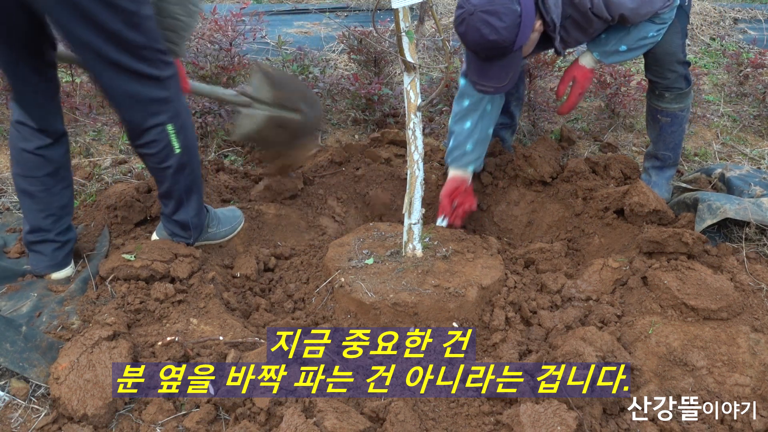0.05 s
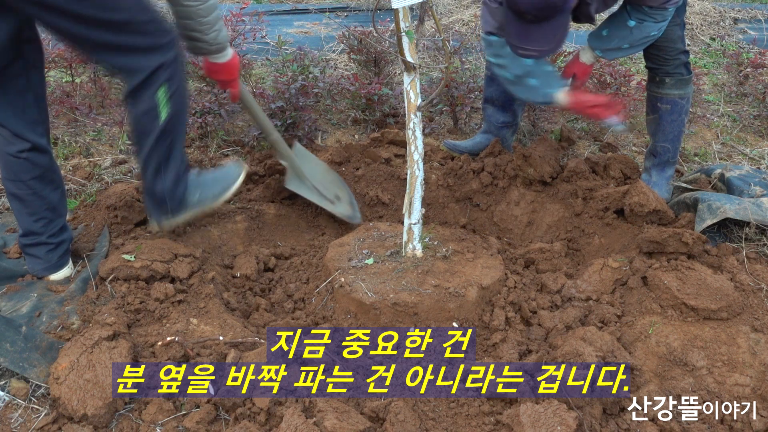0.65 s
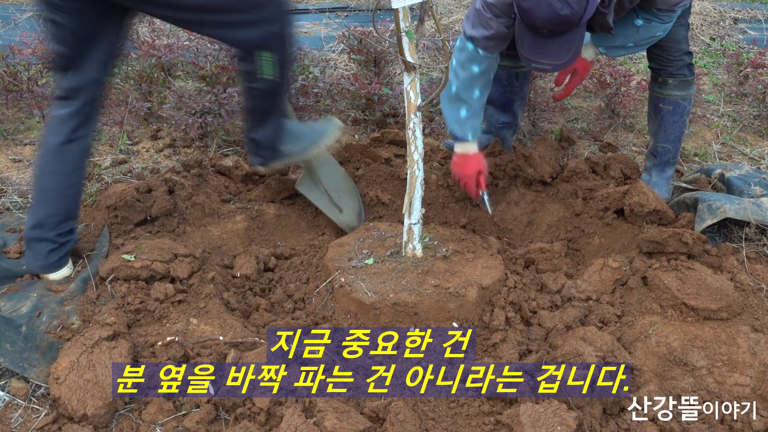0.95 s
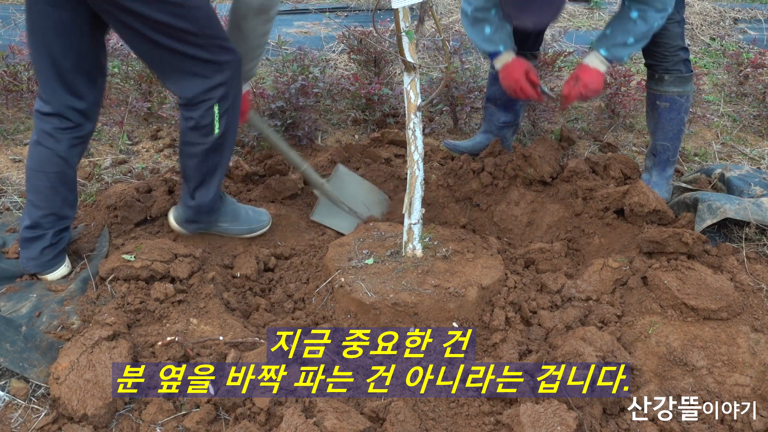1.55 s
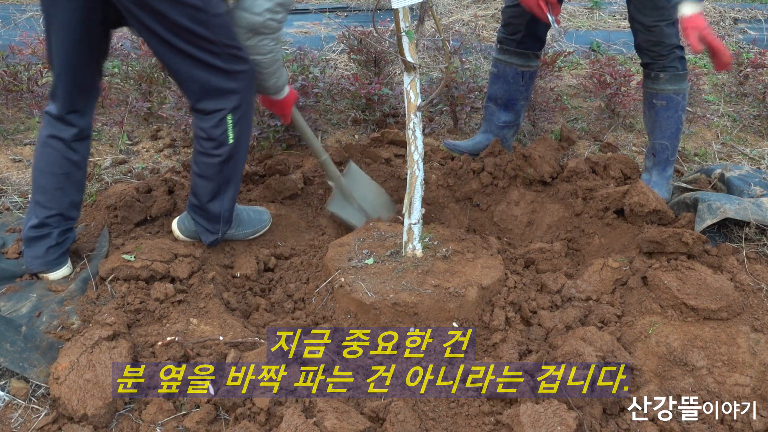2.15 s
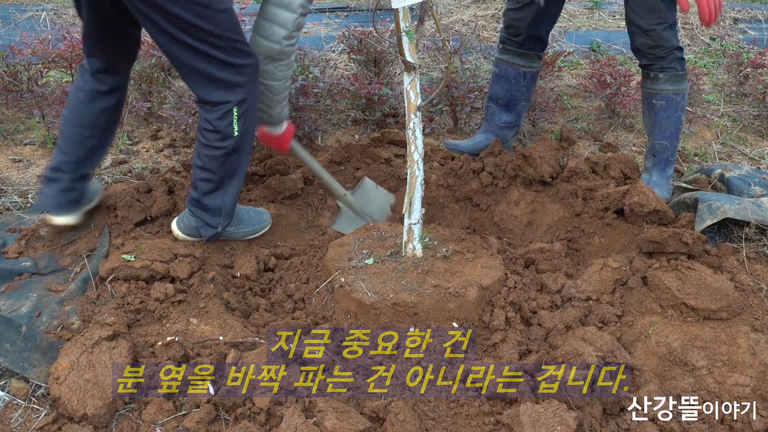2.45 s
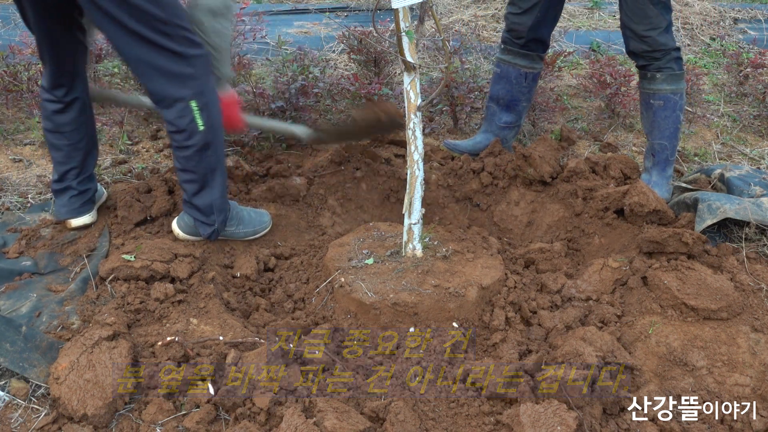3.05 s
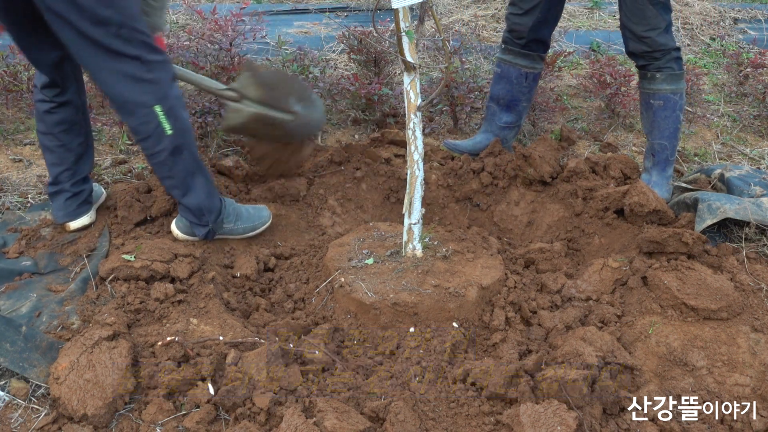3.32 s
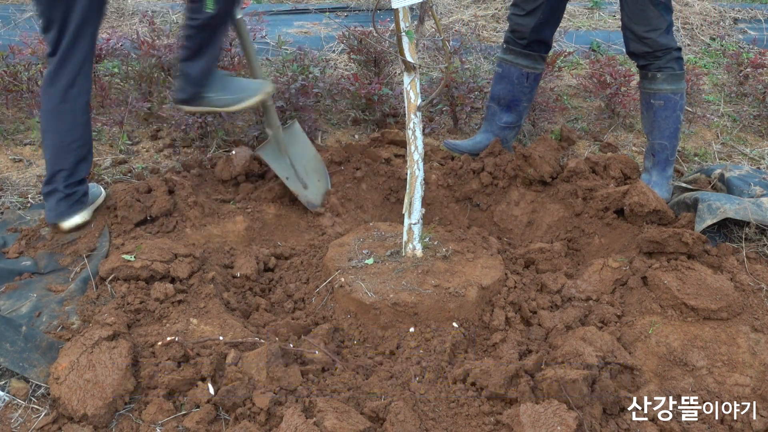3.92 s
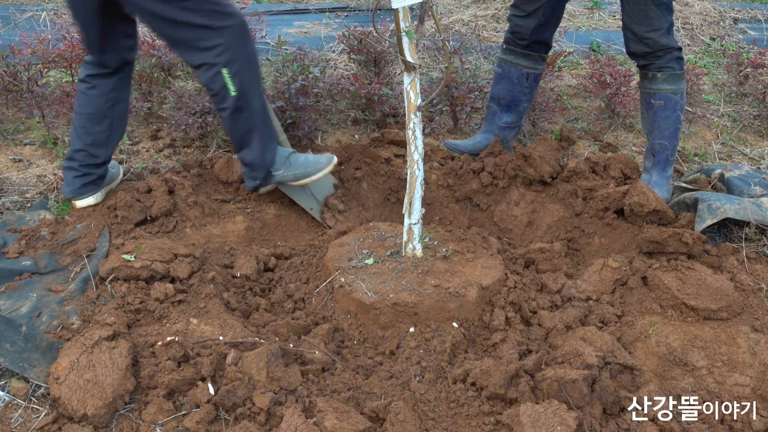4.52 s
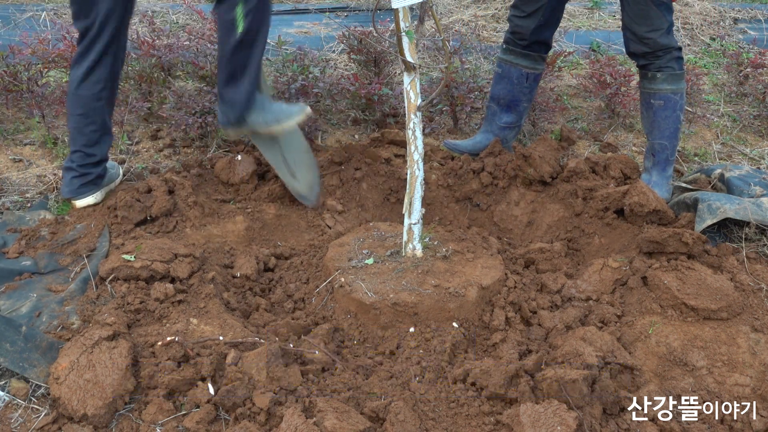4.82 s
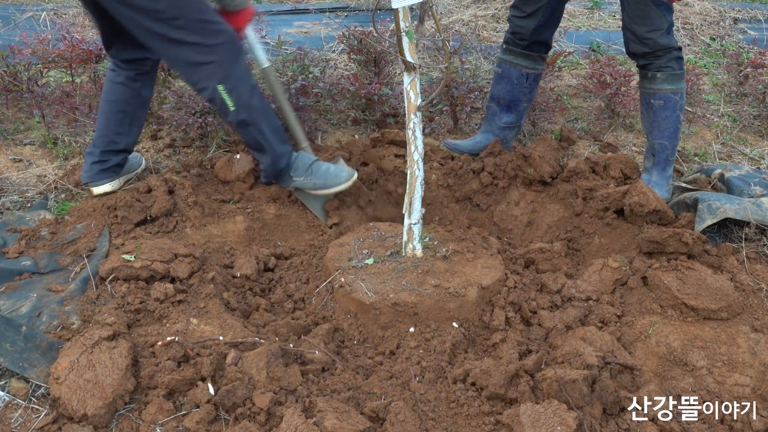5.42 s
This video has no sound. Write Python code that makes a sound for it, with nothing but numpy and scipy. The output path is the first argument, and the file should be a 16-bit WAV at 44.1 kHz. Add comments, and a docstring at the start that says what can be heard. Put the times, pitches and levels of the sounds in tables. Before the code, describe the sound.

A steel shovel blade crunches into hard soil several times, with loose dirt spilling and faint ringing scrapes in between.

```python
"""A steel shovel is stamped into firm clay around a young tree, outdoors, a couple of metres away.
First, over a distant rush like road traffic, pebbles drop and a light scrape makes the free blade ring.
After a second a shoe thuds and the edge bites, grinds through grit and stalls; clods break, fine earth
spills. A softer thrust follows, the rush fades, and loose earth slides between more scrapes.
Two hard thrusts come near 4 and 5 seconds, and a few last pebbles land."""
import sys
import numpy as np
from scipy import signal
from scipy.fft import rfft, irfft
from scipy.io import wavfile

SR = 44100
rng = np.random.default_rng(int(sys.argv[2]) if len(sys.argv) > 2 else 0)


def wrap_up_sound(samples):
    """Save the sound to the file named by the first command line argument, as 16-bit audio."""
    columns = np.atleast_2d(samples).T
    # keep every value between -1 and 1, then stretch to whole-number steps
    tamed = np.clip(columns, -1, 1)
    steps = np.round(tamed * 32767).astype(np.int16)
    wavfile.write(sys.argv[1], SR, steps)


N = 241636
T = np.arange(N) / SR

# each jerk of the blade into the clay:
# (time [s], push length [s], final level [dB], build-up [dB], time to fall 20 dB [s])
BLADE_JERKS = [(1.0676, 0.0142, -9, 1, 0.0465), (1.108, 0.0132, -14, 0, 0.0741),
               (2.248, 0.018, -33, -1, 0.0385), (2.271, 0.04285, -22.5, 0, .026),
               (4.188, .032, -8.7, 19, .032), (5.062, 0.0327, -7.5, 7, .044)]


def undb(db):
    """Turn decibels into a gain, the number a sound is multiplied by."""
    return 10 ** (np.asarray(db) / 20)


def unit(x):
    """Scale to an average power of 1."""
    return x / np.sqrt(np.mean(x ** 2))


def together(gains):
    """Combine gains: unrelated sounds add in power."""
    return np.sqrt(sum(gain ** 2 for gain in gains))


def curve(rows):
    """A gain that follows (time [s], level [dB]) rows."""
    return undb(np.interp(T, *np.transpose(rows)))


def wander(rate):
    """A random drift, roughly 1 in size, that takes a new course rate times a second."""
    knots = rng.standard_normal(8192)
    return np.interp(T * rate, np.arange(len(knots)), knots)


def swell(time, rise, fall):
    """A gain that peaks at the given time; rise and fall are the seconds a 20 dB change takes."""
    return 10 ** -np.minimum(np.where(T < time, ((time - T) / rise) ** 2, (T - time) / fall), 10)


def grains(rate, spread_db):
    """Tiny cracks of uneven size at random moments, about rate of them a second."""
    breaks = rng.random(N) < rate / SR
    return unit(breaks * rng.choice([-1, 1], N) * undb(spread_db * rng.standard_normal(N)))


def colour(x, tone):
    """Shape bass and treble by (pitch [Hz], level [dB]) rows; white noise keeps its power."""
    hz, db = np.transpose(tone)
    freqs = np.maximum(np.arange(N // 2 + 1) * SR / N, 1)
    gains = unit(undb(np.interp(np.log(freqs), np.log(hz), db)))
    return irfft(rfft(x) * gains, N)


def resonate(x, hz, width):
    """Let through a band of pitches around hz; a narrower band rings longer."""
    return signal.lfilter(*signal.iirpeak(min(hz, SR / 2 - 1), hz / min(width, SR / 4), fs=SR), x)


def ring(x, modes, roam_db):
    """Ring an object's natural tones (modes); each gets stronger or weaker as the contact point roams."""
    out = power = 0
    for k, (hz, width, db) in enumerate(modes):
        drive = (-1) ** k * undb(db + roam_db * wander(12))
        out = out + resonate(x * drive, hz, width)
        power += undb(db) ** 2 * np.pi * width / SR
    return out / np.sqrt(power)


def smear(x, fall, rate):
    """Add a short noisy tail, 20 dB down after fall seconds; two tails blend as the contact moves."""
    t = T[:SR // 8]
    turn = 1.66 * wander(rate)
    tails = rng.standard_normal((2, len(t))) * 10 ** (-t / fall)
    return sum(signal.fftconvolve(x * share, tail / np.linalg.norm(tail))[:N]
               for share, tail in zip((np.cos(turn), np.sin(turn)), tails))


def knocks(rows, rise, fall, cycles, breadth):
    """Dull hits, each a burst of noise in one broad band; low ones last longer."""
    out = 0
    for time, db, hz in rows:
        noise = rng.standard_normal(N)
        hit = noise * swell(time, rise, fall + cycles / hz)
        width = breadth * hz
        steady, burst = resonate(resonate([noise, hit], hz, width), hz, width)
        out = out + undb(db) * burst / np.std(steady)
    return out


def distant(tone, side_db, lean_db, waver_db):
    """A far, wide, gently wavering wash of noise, stronger on the left."""
    mid, side = colour(rng.standard_normal((2, N)), tone)
    lean = undb(lean_db / 2)
    stereo = np.array([mid * lean, mid / lean]) + undb(side_db) * np.array([side, -side])
    return stereo * undb(waver_db * wander(15))


def outdoors(x, scatter_db, scatter_s):
    """Place a sound to the left of centre; clods and shrubs scatter a faint echo, unlike on each side."""
    # the blade digs near the centre and throws to the left: (time [s], left minus right [dB])
    place = [(.1, 7.5), (.25, 3), (1.1, 0.15), (2.3, 0.35), (3.3, 2), (4.2, 0.74), (5.1, 0.5)]
    # the echo is stronger in the treble: (pitch [Hz], level [dB])
    echo_tone = [(100, -14), (600, -9.5), (2000, -4), (4500, -1), (8000, -0.5), (12000, 0.5)]
    echo = undb(scatter_db) * colour(smear(x, scatter_s, rate=8.8), echo_tone)
    lean = np.sqrt(curve(place))
    return np.array([x * lean + echo, x / lean - echo])


def open_air():
    """The faint hush of the outdoors."""
    # tone of the hush: (pitch [Hz], level [dB])
    air_tone = [(20, -35), (60, -16), (130, -19), (230, -15), (330, -13), (480, -4), (670, 2), (1000, -1.5),
                (1430, -3.5), (2000, -12), (4100, -14.5), (6000, -15.5), (12000, -17.5), (15500, -23)]
    return undb(-47.5) * distant(air_tone, side_db=-6.5, lean_db=3, waver_db=1.2)


def far_rush():
    """A rush like distant road traffic fades, then comes back a little."""
    # how the rush fades: (time [s], level [dB])
    loudness = [(0, -40.5), (.6, -44), (1.3, -42.5), (1.7, -45), (2.1, -49.5), (3, -54.5), (3.7, -53),
                (5.48, -50)]
    # tone of the rush: (pitch [Hz], level [dB])
    rush_tone = [(100, -41), (400, -26.5), (680, -4), (1450, 0.5), (2100, -4.5), (3000, -14.5),
                 (6000, -23.5), (16000, -24.5)]
    return undb(-1.08) * curve(loudness) * distant(rush_tone, side_db=-10, lean_db=8.5, waver_db=0.62)


def trickling_earth():
    """Fine dry earth spills after each thrust and slides as the blade moves, hissing in small surges."""
    # earth slides as the blade levers, lifts or is set down:
    # (time [s], level [dB], time to swell or fade 20 dB [s], whose sign is ignored)
    earth_slides = [(.38, -48, 0.27), (1.0, -35, 0.1277), (1.389, -40, 0.1738), (1.63, -41.5, 0.24),
                    (1.92, -44, 0.235), (2.22, -49.5, 0.04), (2.479, -41.5, 0.096), (2.601, -36.5, 0.1038),
                    (2.718, -39.5, 0.089), (2.82, -46, .1), (3.299, -41.5, -0.1), (3.6, -46, 0.2743),
                    (3.9, -38.5, 0.221), (4.18, -47, 0.11), (4.49, -43.5, 0.5368), (4.7, -43, 0.52),
                    (4.92, -38, 0.3558)]
    # tone of fine earth: (pitch [Hz], level [dB])
    earth_tone = [(100, -23.5), (300, -10.5), (600, 1), (1500, -0.5), (3000, -2), (5000, -1.5), (8000, -1),
                  (12000, 1.5), (14000, -4.5), (16000, -6.5)]
    spills = [undb(db - 21) * swell(time + length, rise=0.03, fall=0.2824)
              for time, length, db, _, _ in BLADE_JERKS]
    slides = [undb(db) * 10 ** -np.minimum(((T - time) / width) ** 2, 10)
              for time, db, width in earth_slides]
    creep = undb(-61)  # earth that never quite settles
    flow = together(spills + slides + [creep]) * undb(1.2 * wander(70))
    dust = grains(14000, spread_db=3.5)
    crumbs = undb(-8.5) * grains(200, spread_db=5)
    earth = flow * (dust + crumbs)
    return colour(undb(-0.0167) * earth + undb(-13.5) * smear(earth, fall=0.0048, rate=12), earth_tone)


def falling_pebbles():
    """Crumbs and pebbles land with short ticks."""
    # landings: (time [s], level [dB], pitch [Hz])
    landings = [(.0855, -19, 13100), (.318, -30.5, 7900), (.332, -37, 7440), (.352, -33, 8500),
                (.4275, -30, 7550), (1.1735, -21.5, 1013), (2.421, -34, 2000), (2.587, -34.5, 12000),
                (2.812, -38, 1600), (4.2742, -23, 12000), (4.3135, -28, 12500), (4.3272, -24.5, 2000),
                (4.346, -30, 1390), (4.497, -33.5, 3970), (4.758, -35, 1200), (5.302, -31.5, 1570),
                (5.353, -32, 1344), (5.411, -37, 1590)]
    return knocks(landings, rise=0.000395, fall=0.002, cycles=7, breadth=0.815)


def shoe_thuds():
    """Shoes thud on the soil and on the top of the blade."""
    # footfalls: (time [s], level [dB], pitch [Hz])
    steps = [(1.062, -30, 800), (1.513, -44, 429), (1.625, -51, 353), (2.440, -42, 720), (2.578, -46, 520),
             (4.1825, -32, 560), (4.232, -39, 221), (5.262, -45, 364)]
    return knocks(steps, rise=0.0046, fall=0.0298, cycles=2.07, breadth=1.0)


def blade_scrapes():
    """Grains rub along the free blade, whose steel rings on."""
    # the blade brushes the ground: (time [s], level [dB], time to rise 20 dB [s])
    # a minus sign on the rise only shortens the fall
    strokes = [(.800, -27.5, 0.015), (0.832, -29, .006), (.843, -26, 0.0348), (1.850, -38.5, 0.08),
               (1.897, -35.5, 0.053), (1.967, -34.5, 0.0122), (3.298, -36, -0.0413), (3.741, -26, 0.0085),
               (3.753, -22.5, 0.0029), (4.707, -26, 0.0058), (4.726, -25, -0.0044), (4.757, -26.5, -0.0045),
               (4.784, -28.5, 0.0069), (4.872, -28.5, -0.001)]
    # tone of the rubbing: (pitch [Hz], level [dB])
    rub_tone = [(200, -22), (600, -10), (1400, -6), (4500, 1.5), (7000, -1), (12500, -0.5), (14000, -4.5),
                (16000, -5.5)]
    # natural tones of the free blade: (pitch [Hz], width [Hz], level [dB])
    free_modes = [(1310.2, 19.5, 6.5), (1495.6, 20.4, 2), (2223.4, 46.5, 0.5), (2407, 29.6, 4.5),
                  (2891, 46, -7), (3660, 20.7, 1.5), (4441, 43, -4), (5503, 47, -3.5), (6030, 80, -6),
                  (7980, 49, -1), (9050, 82, 1), (11100, 77, 2), (11780, 58, 0), (12400, 97, 4.5),
                  (12670, 40, -8.5), (13100, 52, 3)]
    force = together(undb(db) * swell(time, rise, fall=0.027 + 0.6 * rise) for time, db, rise in strokes)
    rub = force * grains(7000, spread_db=3)
    sheet = undb(-4) * (rub + smear(rub, fall=0.0097, rate=6))
    return colour(sheet, rub_tone) + undb(-4.5) * ring(rub, free_modes, roam_db=3.5)


def push(start, length, build_db, fall):
    """The force of one jerk: a sharp bite, a change of build_db as the blade sinks, then a stall."""
    bite = swell(start, rise=0.0019, fall=np.inf)
    to_go = np.clip((start + length - T) / length, 0, 1)
    stall = 10 ** -np.clip((T - start - length) / fall, 0, 10)
    return bite * undb(-build_db * to_go) * stall


def shovel_thrusts():
    """The edge crushes grit in jerks; the buried blade rings briefly and breaking clods crunch low."""
    # clods breaking under the blade: (time [s], level [dB])
    clods = [(1.077, -14.5), (1.090, -14.5), (1.108, -11.5), (1.118, -15), (1.176, -25.5), (2.295, -24),
             (2.314, -27), (4.218, -21), (4.2365, -12.5), (5.0934, -5.5), (5.098, -6)]
    # tone of crushed grit: (pitch [Hz], level [dB])
    grit_tone = [(30, -32), (150, -24), (330, -20), (500, -14), (900, -7.5), (2000, -2), (3200, -1.5),
                 (5500, -0.5), (7000, -1), (9000, 1), (12000, -1), (14000, -4), (16000, -4.5)]
    # natural tones of the buried blade: (pitch [Hz], width [Hz], level [dB])
    buried_modes = [(2966, 130, -9), (3404, 70, -15.5), (3891, 61, -10.5), (5201, 136, -6.5),
                    (6189, 71, -7.5), (8080, 60, -10.5), (8910, 44, -0.5), (9820, 87, -8),
                    (11160, 98, -3.5), (11237, 39, 5), (12040, 112, -3), (14600, 45, -9)]
    # natural tones of shaft, blade and clod together: (pitch [Hz], width [Hz], level [dB])
    clod_modes = [(279.6, 40.4, -22.5), (468, 97.5, -5.5), (649.2, 116.8, 1.5), (1145.7, 118.6, 2),
                  (1300, 40, 0.5), (1485, 162, -2.5), (2147, 246, -6.5)]
    sink_s, edge_hz = 0.00145, 3980  # until it sinks in, the edge sounds mostly above this pitch
    clod_low_hz = 170  # the crunch carries nothing below this pitch

    jerks = [undb(db) * push(time, length, build, fall) for time, length, db, build, fall in BLADE_JERKS]
    force = together(jerks)
    # harder pushes sink in sooner
    sunk = together(jerk * (1 - np.exp(-np.cumsum(jerk) / SR / sink_s)) for jerk in jerks)
    breaks = together(undb(db) * swell(time, rise=0.00396, fall=0.0207) for time, db in clods)

    judder = undb(1.72 * wander(450))  # the blade sticks and slips
    crushing = judder * grains(16000, spread_db=4)
    coarse = signal.lfilter(*signal.butter(1, edge_hz, fs=SR), crushing)
    crumbling = undb(-3) * breaks  # a breaking clod also crushes grit
    grit = together([force, crumbling]) * (crushing - coarse) + together([sunk, crumbling]) * coarse
    crunch = together([breaks, undb(-12.5) * sunk]) * judder * grains(5000, spread_db=3)
    crunch = signal.sosfilt(signal.butter(2, clod_low_hz, "high", fs=SR, output="sos"), crunch)

    # the steel sheet's many crowded tones die quickly
    sheet = undb(0.11) * grit + undb(-3.5) * smear(grit, fall=0.00556, rate=9)
    blade_ring = undb(-8.5) * ring(grit, buried_modes, roam_db=-0.5)
    clod_ring = undb(-2.5) * ring(crunch, clod_modes, roam_db=-0.1)
    return colour(sheet, grit_tone) + blade_ring + clod_ring


def scene():
    """The blade sounds from one nearby spot; sliding earth spreads wider; open air lies behind it all."""
    digging = undb(-0.85) * shovel_thrusts() + shoe_thuds()
    touches = blade_scrapes() + falling_pebbles()
    work = (outdoors(digging, scatter_db=-16, scatter_s=0.0081)
            + outdoors(touches, scatter_db=-14, scatter_s=0.0164)
            + outdoors(trickling_earth(), scatter_db=-9.5, scatter_s=0.025))
    return work + far_rush() + open_air()


def record(dry):
    """The hardest thrusts overload the microphone; rumble and the highest treble are cut."""
    low_hz, top_hz = 65, 15700
    overloaded = np.clip(dry, -1, 1)
    thinned = signal.sosfilt(signal.butter(2, low_hz, "high", fs=SR, output="sos"), overloaded)
    return signal.sosfilt(signal.ellip(10, .2, 80, top_hz, fs=SR, output="sos"), thinned)


dry = scene()
out = record(dry)
wrap_up_sound(out)
```